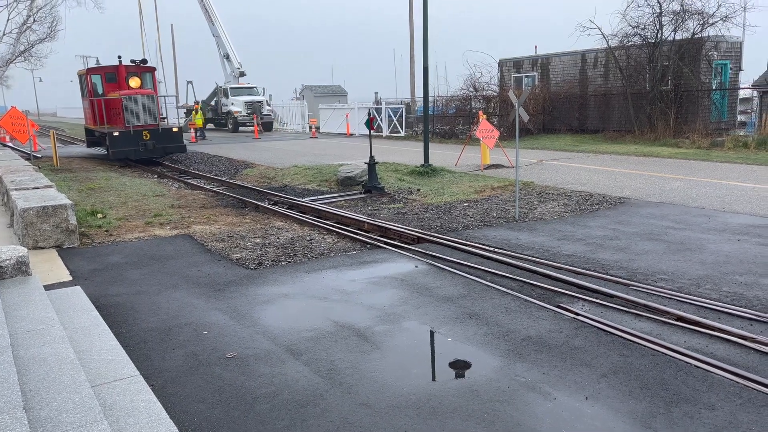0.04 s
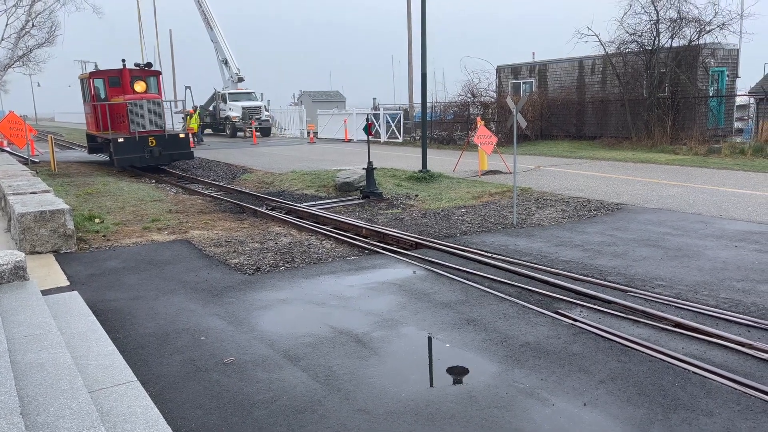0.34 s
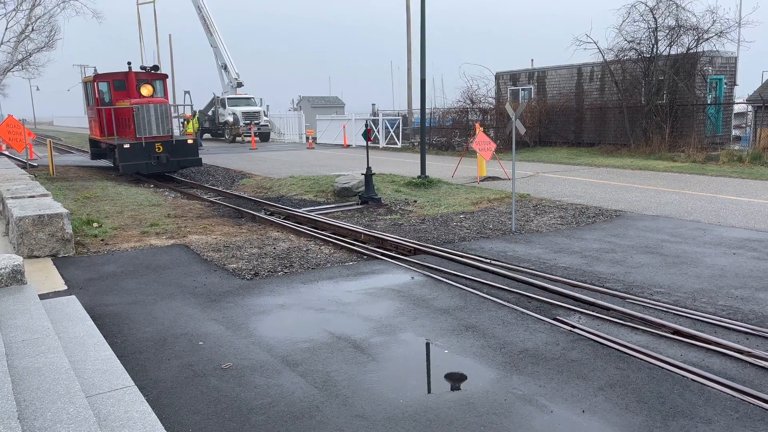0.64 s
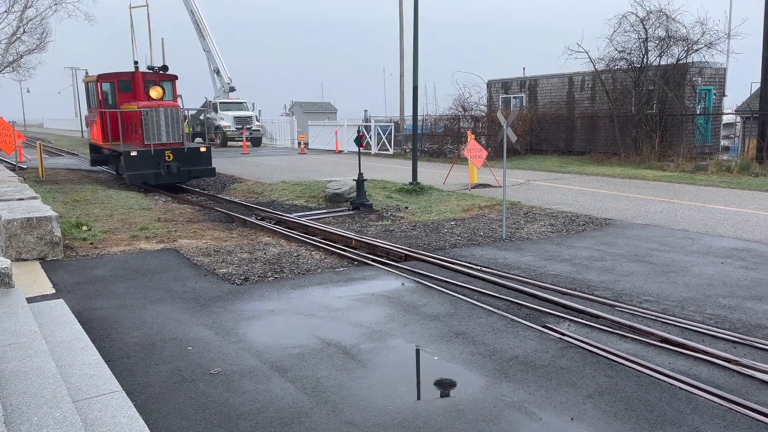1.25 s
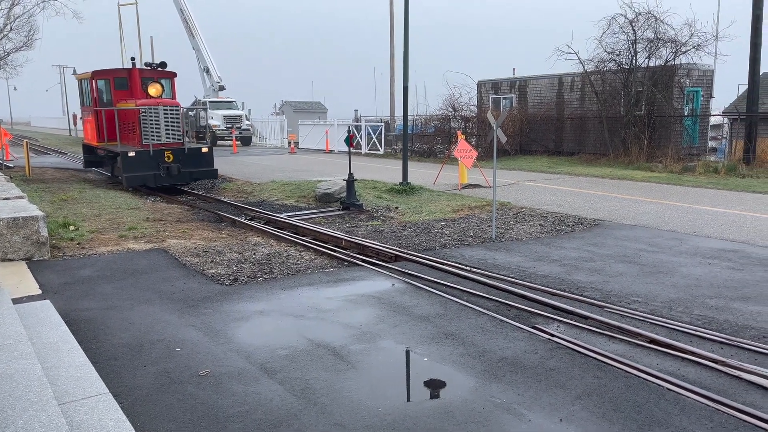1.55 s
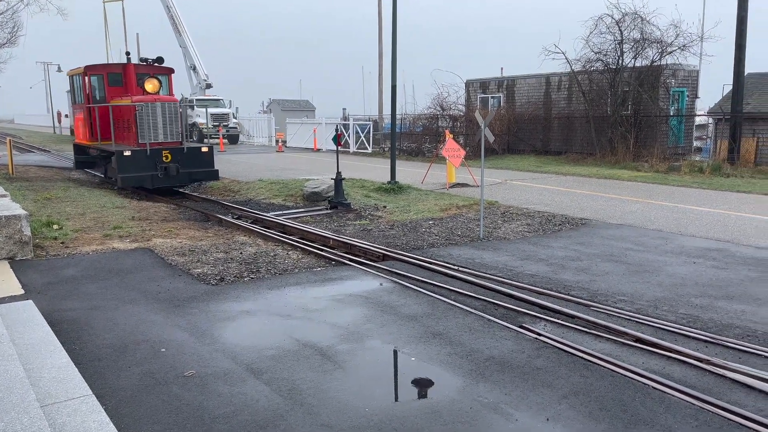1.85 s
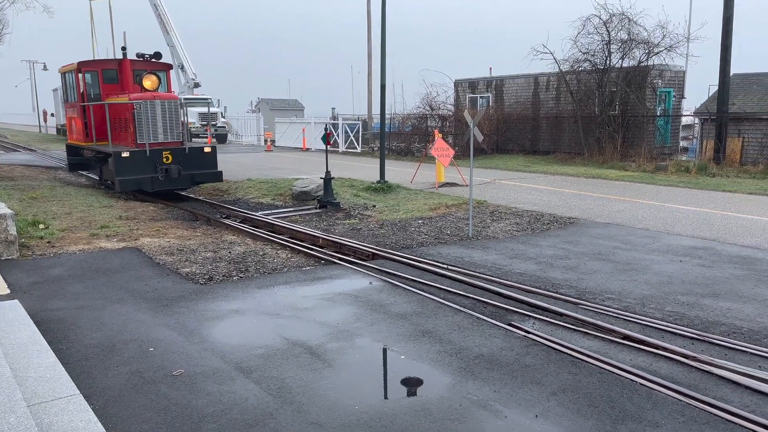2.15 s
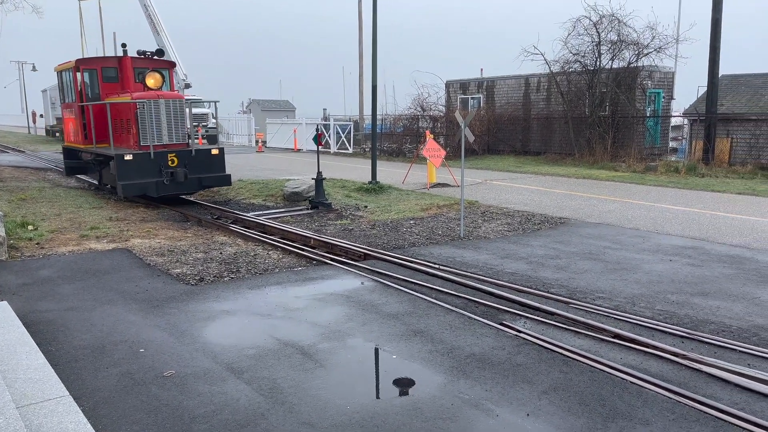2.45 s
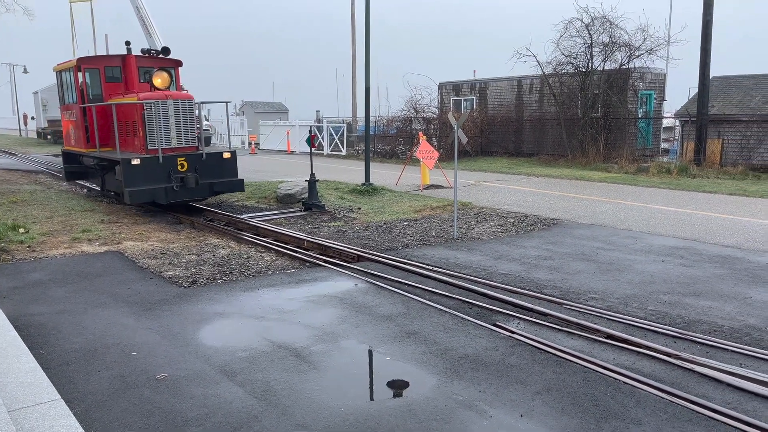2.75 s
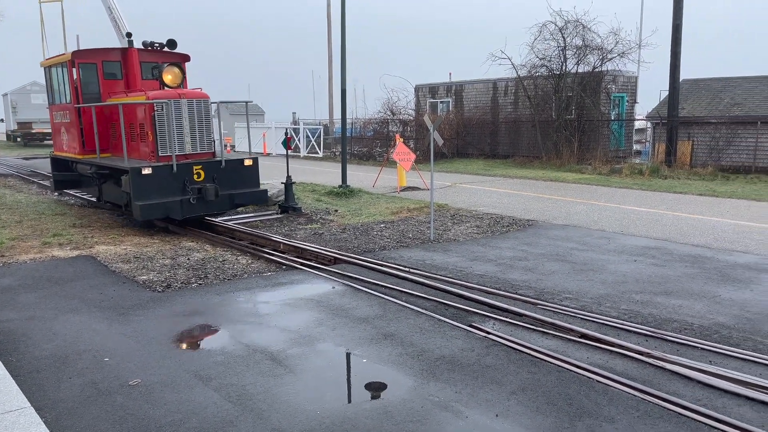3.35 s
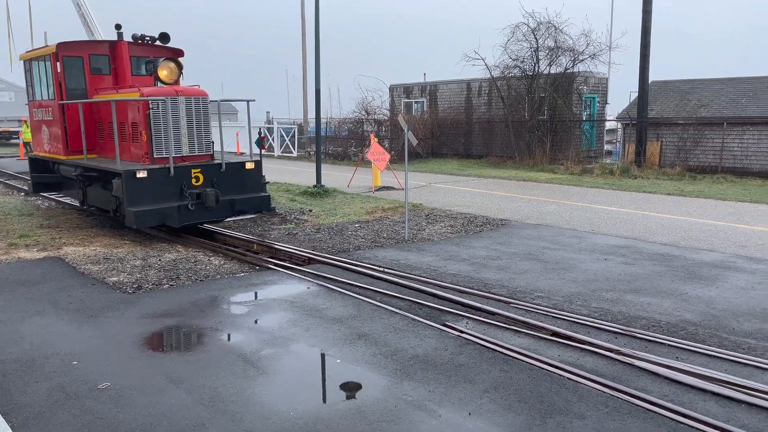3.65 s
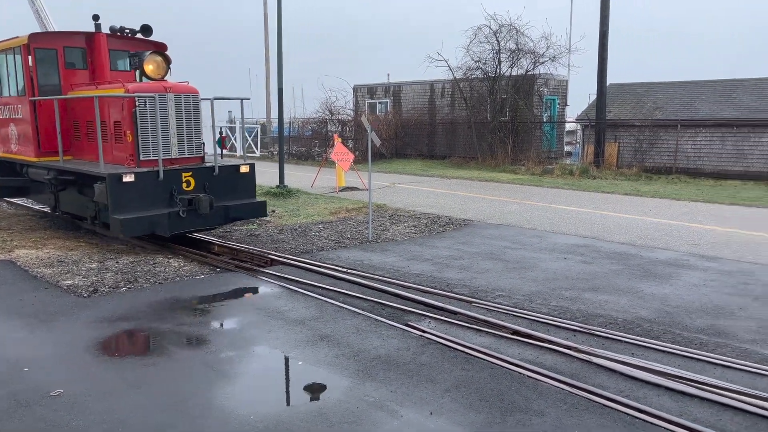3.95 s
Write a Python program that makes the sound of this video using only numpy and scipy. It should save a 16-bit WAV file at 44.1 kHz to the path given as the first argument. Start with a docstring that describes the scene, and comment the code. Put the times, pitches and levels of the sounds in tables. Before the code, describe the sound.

A small diesel locomotive rolls slowly toward the microphone in an open yard. Its bell clangs twice a second over the rumbling, clattering engine, while wheel noise and air hiss swell, with a few knocks and two faint late squeaks.

```python
"""A small six-cylinder diesel locomotive rolls slowly closer across an open yard, ringing its bell.
The exhaust drones and rumbles, valves clatter and air hisses in time with the firings, and the hood hums.
The wheels swell into a roar, with knocks, ticks and two brief squeaks. A clapper strikes the bell twice
a second; it arrives directly, slightly raised by the motion, and as echoes from all around, each with
its own Doppler shift."""
import sys
import numpy as np
from scipy import signal
from scipy.fft import rfft, irfft
from scipy.io import wavfile
from scipy.ndimage import uniform_filter1d, map_coordinates

SR = 44100
rng = np.random.default_rng(int(sys.argv[2]) if len(sys.argv) > 2 else 0)


def store_pcm(level_fs):
    """Save levels as 16-bit WAV."""
    pcm = np.round(np.clip(level_fs, -1, 1) * 32767).astype(np.int16)
    wavfile.write(sys.argv[1], SR, np.atleast_2d(pcm).T)


N = 176400

CYCLE_HZ, CYLINDERS = 8.78, 6  # each cylinder fires once a cycle
MACH = 3.0 / 343  # speed of approach over speed of sound
# tones of the uneven cylinders (multiple of the cycle rate, relative level [dB])
EXHAUST_ORDERS = [(5, -30), (7, -27), (8, -13.5), (9, -8.5), (10, -37), (11, -23.5), (12, -14.5),
                  (13, -18.5), (15, -17), (17, -23), (18, -19.5), (19, -27.5), (21, -17), (31, -19.5),
                  (33, -26.5), (34, -24.5)]
# fader rides of the engine and wheel layers (time [s], level [dB])
DRONE_FADER = [(0, -19), (.9, -17.5), (1.6, -19.5), (2.1, -21), (2.4, -19), (2.7, -16.5), (3.3, -16.5),
               (4, -15)]
RUMBLE_FADER = [(0, -25.5), (.25, -26.5), (.35, -23.5), (.52, -28), (.72, -24.5), (.95, -26), (1.7, -26.5),
                (2.4, -22.5), (3.05, -24.5), (3.35, -19.5), (3.65, -21.5), (4, -22.3)]
CLATTER_FADER = [(0, -38.5), (1.1, -35), (2.0, -36.5), (3, -37.5), (4, -42)]
HISS_FADER = [(0, -37), (1.6, -36.5), (2.2, -35), (2.8, -34.5), (3.5, -32.5), (4, -31)]
HOOD_FADER = [(0, -31), (.6, -38), (1.1, -44), (1.6, -38), (1.9, -30), (2.4, -31), (2.62, -34.5),
              (2.9, -24.5), (3.2, -33), (3.5, -26.5), (4, -54)]
WHEEL_FADER = [(0, -39.5), (1.0, -39), (2.0, -36), (2.8, -31.5), (3.5, -31), (4, -28)]
# tone colours of the noise layers (frequency [Hz], relative level [dB])
RUMBLE_EQ = [(20, -17), (40, -13), (70, 3.5), (110, -1), (165, -1), (230, -6), (290, -6.5), (350, -10.5),
             (450, -19.5)]
CLATTER_EQ = [(400, -9.5), (600, -6.5), (850, -2.5), (1130, 1.5), (1400, -15), (1800, -10), (2300, -54)]
HISS_EQ = [(1400, 5.5), (2000, 3.5), (2500, 8), (3100, 1.5), (3800, 4), (4500, 2.5), (5200, -2), (6500, -4),
           (7900, -14), (9200, -9), (11000, -11.5), (12500, -15), (14500, -27)]
WHEEL_EQ = [(220, -36), (370, -7), (470, -0.5), (560, 2.5), (800, 3), (1000, -3.5), (1200, -8), (1400, -21)]
# modes of the engine hood (frequency [Hz], relative level [dB])
HOOD_RESONANCES = [(272, -5), (296, 0)]
# modes of the frame and gears (frequency [Hz], width [Hz], level against the wheel roar [dB])
FRAME_MODES = [(534.2, 23, -10), (698.5, 26, -14), (770, 10.7, -9.5), (852, 8.6, -11.5), (1077, 10, -15.5),
               (1987, 12, -22)]
# bell partials (frequency [Hz])
PARTIAL_HZ = [763, 1403, 1650, 2766, 4152, 5707, 7365, 9170, 11010]
# ring of each partial (level [dB], main decay to -60 dB [s])
PARTIAL_RING = [(-49, 2.7), (-47, 5.1), (-42.5, 5.7), (-29, 1.1), (-30.5, 0.79), (-37.5, 1.17),
                (-42.5, 0.87), (-45, 0.82), (-48.5, 0.84)]
# which of a blow's four levels drives each partial (index)
PARTIAL_BAND = [0, 0, 0, 1, 2, 2, 3, 3, 3]
# clapper blows (time [s], low partials [dB], strike note [dB], clang [dB], top partials [dB])
BELL_BLOWS = [(-.17, -.5, -4, -3.5, -7), (.312, -5, -6, -1.2, -3.5), (.79, 1, -4.5, -2.5, -5.5),
              (1.275, 0, -7, -2.8, -6), (1.757, 4.5, -5.5, -6, -2.5), (2.236, 2.5, -4, -7.5, -7),
              (2.712, 1.5, 0, -3, -1.5), (3.195, 2, -3.5, -5, -6), (3.683, -3, -2, -5.5, -3.5)]
# the ground reflection thins the direct bell in places (frequency [Hz], gain [dB])
GROUND_EQ = [(760, -5), (1400, 3), (1650, -1), (2780, 4), (4200, 0), (5750, -6), (9200, 0)]
# colour of the echoes from behind the locomotive (frequency [Hz], gain [dB])
BEHIND_EQ = [(1600, -1), (2800, 0), (4200, 1), (9000, -3.5)]
# sharp ticks (time [s], level [dB], centre [Hz])
TICK_HITS = [(.902, -28, 9000), (1.758, -20, 4040), (1.758, -25, 9500), (2.866, -31, 7000),
             (3.404, -36, 4770)]
# running-gear knocks and wheel squeaks (time [s], level [dB], centre [Hz], decay [s])
GEAR_KNOCKS = [(1.193, -25, 456, 0.019), (1.199, -24.5, 290, 0.024), (1.346, -26, 865, 0.01),
               (1.355, -24, 356, 0.027), (2.244, -28, 477, 0.0089), (2.335, -24, 270, 0.018),
               (2.858, -24, 864, 0.0099), (3.275, -25.5, 1501, 0.0087), (3.27, -21.5, 183, 0.065),
               (3.28, -32, 380, 0.056), (3.495, -27, 490, 0.039), (3.744, -23.5, 295, 0.048),
               (3.955, -30.5, 750, .015)]
WHEEL_SQUEAKS = [(3.47, -40, 1964, 0.061), (3.799, -35, 3560, 0.026)]
# stereo direction (frequency [Hz], phase lead of the left [rad])
LEFT_LEAD = [(0, 0), (50, .15), (80, .15), (120, -.3), (300, 0), (400, .2), (530, 1.1), (700, 1.1),
             (850, 1.45), (1100, 1.3), (1400, 2.4), (1650, 1.3), (2400, 2.7), (2800, 3.2), (3300, 5.3),
             (3800, 5.9), (4200, 5.8), (4700, 7.2), (6500, 6.3), (7400, 8.3), (9200, 7.7), (10400, 6.3),
             (15000, 6.3)]
# stereo balance (frequency [Hz], left minus right [dB])
BALANCE = [(50, -0.8), (110, 2), (280, 0), (520, 3), (750, 5), (1100, 6), (1400, 1), (1700, -1),
           (2300, -1.5), (2800, -4.5), (3500, 0), (4200, 0.5), (5700, 2), (7400, 3), (9200, -1.5),
           (11000, -0.5)]
# likeness of left and right (frequency [Hz], coherence [0-1])
COHERENCE = [(40, 0.49), (80, 0.86), (130, 0.24), (250, 0.61), (300, 0.81), (400, 0.15), (530, 0.57),
             (780, 0.56), (1100, 0.37), (1600, 0.16), (2000, 0.29), (2700, 0.72), (3300, 0.32),
             (4000, 0.53), (5200, 0.021), (7400, 0.89), (9200, 0.069), (11000, 0.96)]

TIME, FREQS = np.arange(N) / SR, np.fft.rfftfreq(N, 1 / SR)


def undb(db):
    """Decibels to gain."""
    return 10 ** (np.asarray(db) / 20)


def unit(x):
    """Scale to rms 1."""
    return x / np.sqrt(np.mean(x ** 2))


def fader(rows):
    """Gain over time from (time [s], level [dB]) points."""
    return undb(np.interp(TIME, *np.array(rows, float).T))


def per_bin(rows):
    """Read (frequency [Hz], value) points on a log-frequency axis."""
    hz, value = np.array(rows, float).T
    return np.interp(np.log(FREQS + 1), np.log(hz + 1), value)


def eq(rows):
    """EQ curve that rolls off steeply past its ends."""
    f = FREQS + 1
    return undb(per_bin(rows)) * np.minimum(1, np.minimum(f / rows[0][0], rows[-1][0] / f)) ** 4


def band(hz, width_hz):
    """Response of two like resonances in series."""
    f = FREQS + 1
    return 1 / (1 + 1j * (f / hz - hz / f) * hz / width_hz) ** 2


def shaped(x, response):
    """Filter a sound and scale it to rms 1."""
    return unit(irfft(rfft(x) * response, N))


def drift(rate_hz):
    """Smooth random motion with rms 1."""
    hold = int(SR / rate_hz)
    steps = np.repeat(rng.standard_normal(1024), hold)[:N]
    return unit(uniform_filter1d(uniform_filter1d(steps, hold), hold))


def burst(start, decay_s):
    """Quick attack, exponential tail."""
    age = np.maximum(TIME - start, 0) / decay_s
    return 2 * np.exp(-age) * (1 - np.exp(-4 * age))


def placed(x):
    """Sound from the locomotive's side reaches the left first."""
    lead = np.interp(FREQS, *np.array(LEFT_LEAD, float).T)
    return irfft(rfft(x) * np.exp(.5j * np.array([lead, -lead])), N)


def yard_noise():
    """Stereo white noise, partly direct and partly scattered by the yard."""
    alike = per_bin(COHERENCE)
    noise = rfft(rng.standard_normal((3, N)))
    return placed(irfft(noise[0] * np.sqrt(alike) + noise[1:] * np.sqrt(1 - alike), N))


def throb(cycle, depth):
    """Gain that pulses with each firing and each turn of the crank."""
    return unit((1 + depth * np.cos(CYLINDERS * cycle)) * (1 + .12 * np.cos(2 * cycle)))


def exhaust_drone(cycle):
    """The firing tone, thickened by the tones of the uneven cylinders."""
    tones = fader(DRONE_FADER) * np.cos(CYLINDERS * cycle)
    for order, db in EXHAUST_ORDERS:
        phase = order * cycle + rng.uniform(0, 2 * np.pi)
        scatter = .58 * np.array([drift(2.92), drift(2.96)])  # reflections shift each side differently
        tones = tones + undb(db - 18 + 2 * drift(3)) * np.cos(phase + scatter)
    return placed(np.sqrt(2) * tones)


def exhaust_rumble(cycle):
    """Low exhaust noise puffs with the firings and lopes by about a decibel."""
    rumble = shaped(yard_noise(), eq(RUMBLE_EQ)) * fader(RUMBLE_FADER)
    return rumble * throb(cycle, depth=.3) * undb(drift(20))


def valve_clatter(cycle, repeat_share=.57):
    """Part of the valve noise comes back alike in every engine cycle; the rest is fresh."""
    loop_index = (cycle / (2 * np.pi) % 1 * SR / CYCLE_HZ).astype(int)
    looped = np.sqrt(repeat_share) * yard_noise()[:, loop_index]
    valves = looped + np.sqrt(1 - repeat_share) * yard_noise()
    return shaped(valves, eq(CLATTER_EQ)) * fader(CLATTER_FADER) * throb(cycle, depth=.1)


def air_hiss(cycle, noise):
    """Air hisses, flickering and pulsing lightly with the firings."""
    hiss = shaped(noise, eq(HISS_EQ)) * fader(HISS_FADER)
    return hiss * throb(cycle, depth=.06) * undb(.44 * drift(14))


def hood_hum(shake):
    """Two close modes of the shaken engine hood beat against each other."""
    modes = sum(undb(db) * band(hz, width_hz=18.7) for hz, db in HOOD_RESONANCES)
    return shaped(shake, modes) * fader(HOOD_FADER)


def wheel_roar(shake):
    """The wheels roar and jolt, and the frame and gears ring along."""
    frame = sum(undb(db) * shaped(shake, band(hz, width)) for hz, width, db in FRAME_MODES)
    roar = shaped(yard_noise(), eq(WHEEL_EQ))
    return (roar + frame) * fader(WHEEL_FADER) * undb(1.2 * drift(45))


def bell_ring(clock):
    """Each blow adds a fresh set of shimmering partials, which bite, fade and ring on."""
    ring, shimmer = np.zeros(len(clock)), drift(200)
    age = np.arange(2 * SR) / SR
    attack = (1 - np.exp(-age / .0022)) * (1 + .37 * np.exp(-age / .023))  # fast rise, brief bite
    for hz, (db, t60), group in zip(PARTIAL_HZ, PARTIAL_RING, PARTIAL_BAND):
        loss = np.log(1000) * age / t60
        tail = .8 * np.exp(-loss) + .2 * np.exp(-loss / 4.7)  # a weakly radiating twin rings longer
        partial = np.zeros(len(clock) + len(age))
        for start, *force_db in BELL_BLOWS:
            first = np.searchsorted(clock, start * (1 + MACH))
            flutter = .18 * hz / 4152 * np.roll(shimmer, rng.integers(N))  # deeper on high partials
            phase = 2 * np.pi * (hz * age + rng.random()) + flutter[-len(age):]
            envelope = undb(db + force_db[group]) * attack * tail * (1 + flutter[:len(age)])
            partial[first:first + len(age)] += envelope * np.sin(phase)
        ring += np.sqrt(2) * partial[:len(clock)]
    return ring


def bell_in_yard(echo_count=24, oversample=4):
    """The approach raises the direct bell; echoes from behind are lowered and beat against it."""
    clock = np.arange(-SR, N + SR // 2) / SR  # starts 1 s early
    ring = signal.resample_poly(bell_ring(clock), oversample, 1)

    def path(lag_s, facing):
        """The bell along one path of wavering length; facing is 1 ahead, -1 behind."""
        sent = TIME * (1 + facing * MACH) - lag_s + .00005 * drift(12)
        return map_coordinates(ring, [(sent + 1) * SR * oversample], order=1)

    echoes, power = np.zeros((2, 2, N)), 0  # ahead or behind, mid or side
    for k, (distance, angle) in enumerate(rng.random((echo_count, 2))):
        facing = 1 - 2 * (k + angle) / echo_count
        lag_s = .008 + .22 * distance + (facing - 1) * MACH
        gain = undb(-17.5 * distance)
        echoes[int(facing < 0), k % 2] += gain * path(lag_s, facing)
        power += gain ** 2
    alike = per_bin(COHERENCE)
    spread = np.sqrt(np.array([1 + alike, 1 - alike]) / power)
    ahead, behind = rfft(echoes)
    mid, side = (ahead + behind * undb(per_bin(BEHIND_EQ))) * spread * undb(.5)
    direct = rfft(path(0, facing=.99)) * undb(per_bin(GROUND_EQ) - 3)
    return placed(irfft(direct + np.array([mid + side, mid - side]), N))


def clapper_clank():
    """The clapper lands on the bell with a short metallic clank."""
    hits = sum(burst(start, decay_s=.014) for start, *_ in BELL_BLOWS)
    return shaped(yard_noise(), band(2480, width_hz=1700)) * undb(-34) * hits


def ticks(grit):
    """A few tiny, bright snaps."""
    return sum(shaped(grit, band(hz, .75 * hz)) * undb(db) * burst(start, decay_s=.0009)
               for start, db, hz in TICK_HITS)


def gear_knocks(grit):
    """The running gear knocks in dull, broad thuds."""
    return sum(shaped(grit, band(hz, 1.03 * hz)) * undb(db) * burst(start, decay_s)
               for start, db, hz, decay_s in GEAR_KNOCKS)


def wheel_squeaks(grit):
    """The wheels squeak briefly, each time in one narrow band."""
    return sum(shaped(grit, band(hz, width_hz=110)) * undb(db) * burst(start, decay_s)
               for start, db, hz, decay_s in WHEEL_SQUEAKS)


def scene():
    """Engine, wheels, bell and small hits, mixed and panned by frequency."""
    cycle = 2 * np.pi * np.cumsum(CYCLE_HZ * (1 + .003003 * drift(3.003))) / SR  # engine phase [rad]
    mix = exhaust_drone(cycle) + exhaust_rumble(cycle) + valve_clatter(cycle)
    shake = yard_noise()
    mix += air_hiss(cycle, shake) + hood_hum(shake) + wheel_roar(shake)
    mix += bell_in_yard() + clapper_clank()
    grit = yard_noise()
    mix += ticks(grit) + gear_knocks(grit) + wheel_squeaks(grit)
    pan_db = per_bin(BALANCE)
    return irfft(rfft(mix) * undb(np.array([pan_db, -pan_db]) / 2), N)


def record(dry):
    """A steep high cut at 14.5 kHz."""
    return signal.sosfilt(signal.ellip(8, .2, 80, 14500, fs=SR, output="sos"), dry)


dry = scene()
out = record(dry)
store_pcm(out)
```